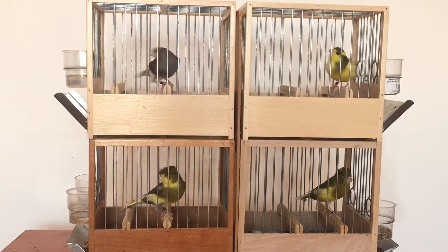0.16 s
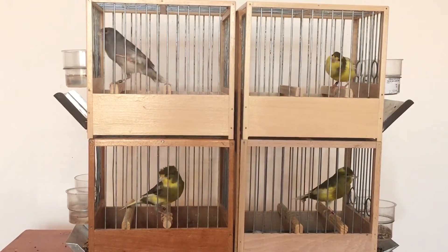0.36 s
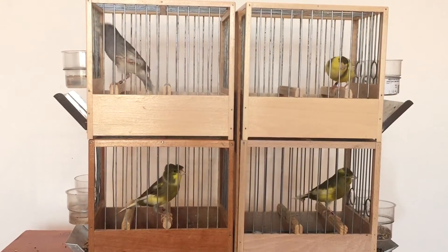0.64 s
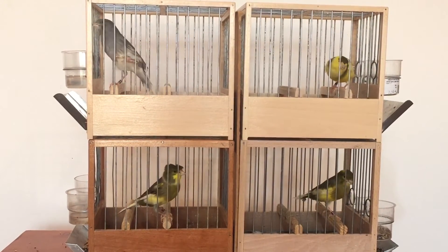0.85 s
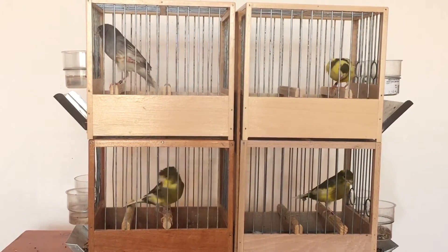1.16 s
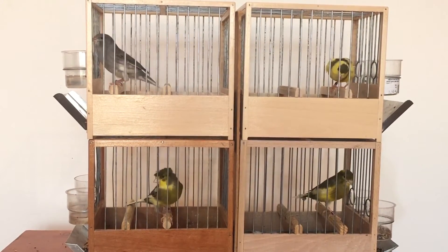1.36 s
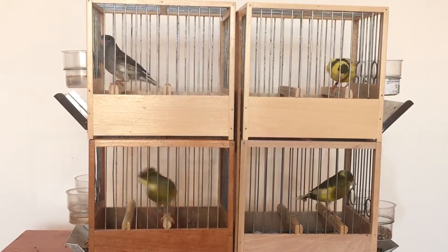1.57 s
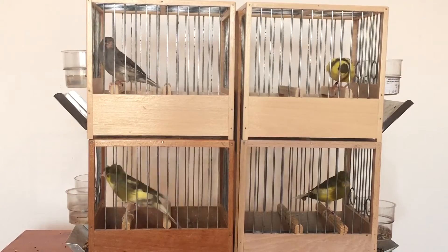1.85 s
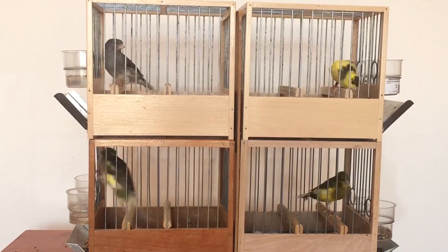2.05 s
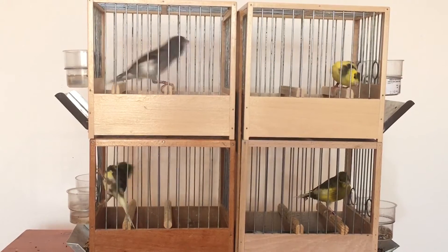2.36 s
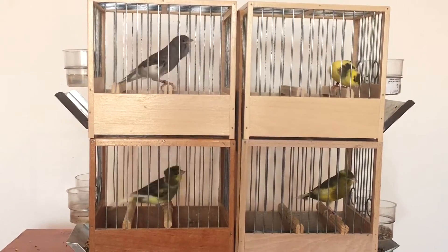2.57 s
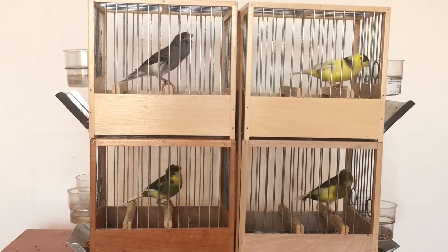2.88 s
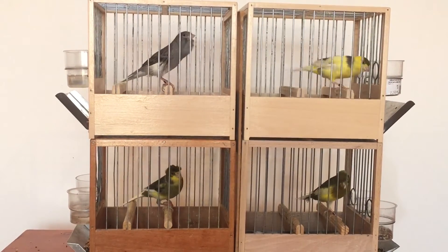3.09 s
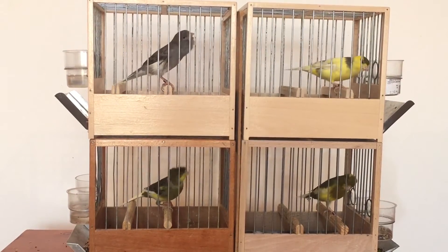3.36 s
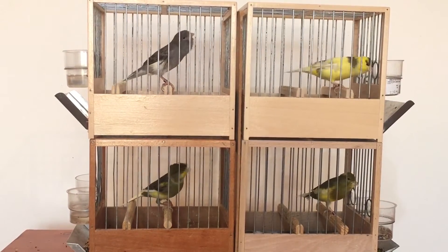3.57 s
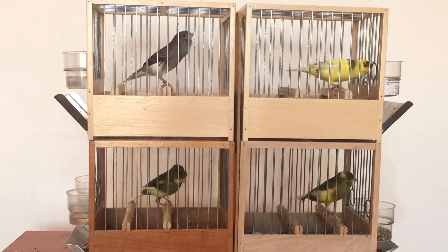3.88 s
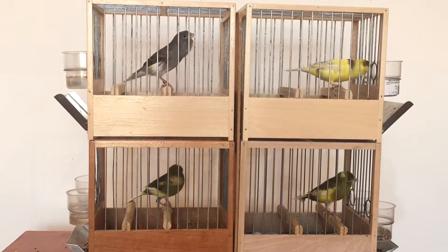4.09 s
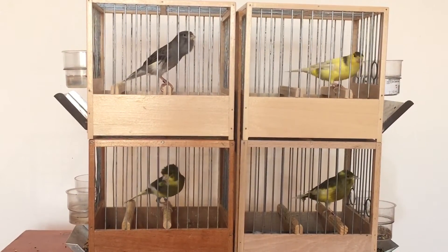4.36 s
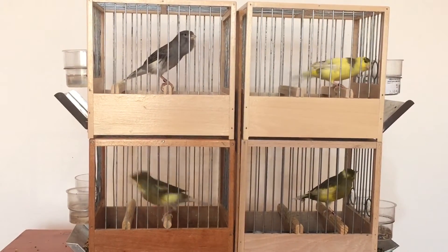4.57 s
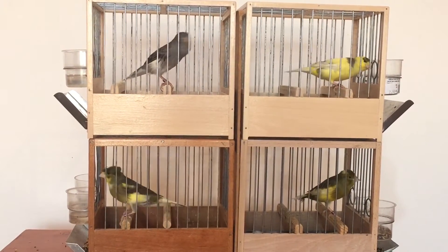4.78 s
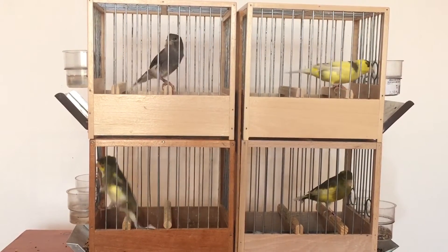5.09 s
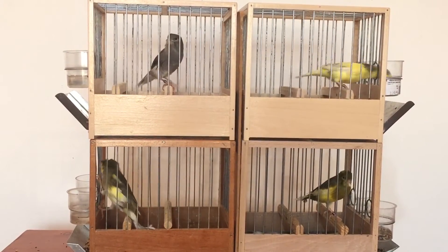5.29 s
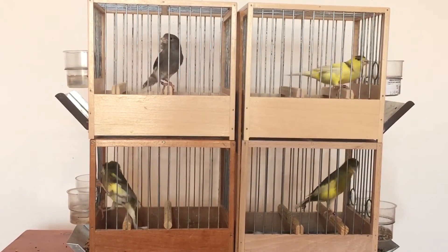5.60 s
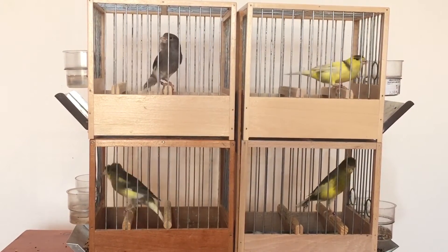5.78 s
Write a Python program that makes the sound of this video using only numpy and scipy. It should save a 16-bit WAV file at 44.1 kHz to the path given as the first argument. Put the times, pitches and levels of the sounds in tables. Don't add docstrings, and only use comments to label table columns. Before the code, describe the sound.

Fairly close microphone in a hard-walled room with faint hiss and low rumble. First come short buzzy two-voiced calls, hollow perch taps, small rustles and echoing warbles of birds farther off. From the middle, one canary sings a bowed, sliding, fluted phrase three times, moves to a louder regular trill at about five per second, then two quick low swoops and crisp ticking. A few dull cage bumps interrupt.

```python
import sys
import numpy as np
from scipy import signal
from scipy.fft import rfft, irfft
from scipy.io import wavfile
from scipy.ndimage import uniform_filter1d

SR = 44100
rng = np.random.default_rng(int(sys.argv[2]) if len(sys.argv) > 2 else 0)


def invert_db(level):
    return 10 ** (np.asarray(level, dtype=float) / 20)


def dump_mix(stems):
    frames = np.atleast_2d(stems).T
    limited = np.clip(frames, -1, 1)
    pcm = np.round(limited * 32767).astype(np.int16)
    wavfile.write(sys.argv[1], SR, pcm)


N = 261954
TOP_HZ = 16200


def rms_one(x):
    return x / np.sqrt(np.mean(x ** 2) + 1e-20)


def at_hz(points, hz):
    points_hz, points_db = np.transpose(points)
    return np.interp(np.log(np.maximum(hz, 1)), np.log(points_hz), points_db)


def coloured(spectrum):
    white = rfft(rng.standard_normal(N))
    return rms_one(irfft(white * invert_db(at_hz(spectrum, np.fft.rfftfreq(N, 1 / SR))), N))


def drift(rate_hz):
    r = np.exp(-2 * np.pi * rate_hz / SR)
    settled = signal.lfilter([1], [1, -2 * r, r * r], rng.standard_normal(N + 9000))[9000:]
    return rms_one(settled)


def add(track, piece, start_s):
    i = max(round(start_s * SR), 0)
    track[i:i + len(piece)] += piece[:len(track) - i]


def ring(hz, t60_s, rise_cycles=6.0):
    t = np.arange(round(t60_s * SR)) / SR
    swell = np.sin(np.pi / 2 * np.minimum(t * hz / rise_cycles, 1)) ** 2
    return np.sin(2 * np.pi * hz * t) * invert_db(-60 * t / t60_s) * swell


# pitch_hz, density_db (dB per Hz)
FLOOR_COLOUR = [(150, -5), (300, -3.5), (800, -9.5), (1500, -5), (2500, -7.5), (5000, -14.5),
                (10000, -19.5), (16000, -18)]


def quiet_floor():
    return invert_db(-67.5 + 0.25 * drift(0.54)) * coloured(FLOOR_COLOUR)


# pitch_hz, density_db (dB per Hz)
RUMBLE_COLOUR = [(22, -39), (36, -14.5), (55, 2), (110, 0), (200, 1), (350, -15.5), (700, -82)]
# peak_s, peak_db, half_length_s
THUDS = [
    (0.682, -72, 0.044),
    (0.783, -67, 0.02),
    (1.848, -74, 0.29),
    (3.647, -72, 0.11),
    (3.874, -69, 0.12),
    (4.032, -58, 0.014),
    (4.282, -78, 0.1),
    (4.767, -53.5, 0.0052),
    (5.935, -76, 0.012),
]


def house_rumble():
    noise, t = coloured(RUMBLE_COLOUR), np.arange(N) / SR
    swells = sum(invert_db(peak_db) * np.exp(-((t - s) / half) ** 2) for s, peak_db, half in THUDS)
    return (invert_db(-80 + 3 * drift(3.1)) + swells) * noise


# start_s, end_s, first_hz, last_hz, level_db
WHISTLES = [
    (0.05, 0.065, 1734, 1756, -49),
    (.235, .26, 1730, 1740, -63.5),
    (.64, 0.69, 1800, 1790, -57.5),
    (1.13, 1.19, 2760, 2230, -52),
    (1.265, 1.34, 1900, 1840, -55.5),
    (1.35, 1.44, 1800, 1740, -55.5),
    (1.29, 1.404, 2800, 2900, -62),
    (1.3, 1.39, 2700, 3900, -65),
    (2.085, 2.095, 8100, 8200, -58),
    (1.95, 2.12, 4000, 3600, -65.5),
]
# start_s, end_s, first_hz, last_hz, level_db
WARBLES = [(.665, .73, 3450, 3374, -54.5), (.7, .8, 2880, 2933, -53.5), (.74, .8, 3615, 3310, -57),
           (.79, .85, 3227, 3306, -48), (.93, 1.0, 3350, 3330, -73), (.79, .86, 3650, 3600, -66),
           (.82, .89, 2600, 2970, -61), (.87, .95, 3200, 4200, -70.5), (1.17, 1.33, 2320, 2197, -53.5),
           (1.14, 1.22, 2720, 2530, -65), (1.3, 1.395, 2500, 2220, -69), (1.75, 1.843, 2650, 2150, -51),
           (1.87, 1.983, 1846, 1810, -49.5), (4.546, 4.626, 901, 903, -48.5), (1.75, 1.8, 1400, 1690, -61),
           (0.57, .8, 1800, 1760, -66.5), (5.772, 5.83, 4000, 3400, -55), (5.775, 5.84, 3900, 2700, -49),
           (5.85, 5.93, 2900, 3100, -45)]


def far_birds():
    out, wobble = np.zeros(N), drift(113)
    for rows, share_of_pitch in [(WHISTLES, 0.015), (WARBLES, 0.032)]:
        for start_s, end_s, first_hz, last_hz, level_db in rows:
            count = round((end_s - start_s) * SR)
            glide_hz = np.linspace(first_hz, last_hz, count)
            hz = glide_hz * (1 + share_of_pitch * wobble[round(start_s * SR):][:count])
            tone = np.sin(2 * np.pi * np.cumsum(hz) / SR)
            add(out, invert_db(level_db) * signal.windows.tukey(count, .35) * tone, start_s)
    return out


# start_s, peak_db, main_hz, side_modes_db
HOPS = [(0.256, -49.5, 1050, -5.5), (0.333, -40.5, 1060, -24), (0.715, -60.5, 1314, 8),
        (1.078, -26.5, 915, -22.5), (1.35, -43, 1034, -6), (1.526, -48, 1074, -2), (1.624, -28, 1046, -25),
        (1.743, -28, 1019, -19), (1.874, -23.5, 1035, -5), (2.151, -46.5, 1020, -2), (2.445, -40, 958, -8),
        (2.631, -27.5, 913, -8.5), (2.865, -36, 995, -14), (2.918, -23.5, 981, -12.5),
        (5.442, -38, 956, -31), (5.802, -32, 992, 1), (5.922, -37.5, 1090, -6)]
# ring_ratio, t60_s
SIDE_MODES = [(.7, 0.021), (0.857, 0.022), (1.15, 0.028), (1.602, 0.05), (1.819, 0.033), (2.6, 0.018)]
# ring_ratio, level_db
TWIN_MODES = [(.95, -9), (1.062, -5.5)]


def perch_knocks():
    out, perch_gain_db, perch_t60_s = np.zeros(N), -3.5, 0.047
    spreads_db = rng.normal(0, 4.1, (len(HOPS), len(SIDE_MODES)))
    for (start_s, peak_db, hz, side_db), spread_db in zip(HOPS, spreads_db):
        knock_db = peak_db + perch_gain_db
        add(out, invert_db(knock_db) * ring(hz, perch_t60_s), start_s)
        for ratio, twin_db in TWIN_MODES:
            add(out, invert_db(knock_db + twin_db) * ring(hz * ratio, perch_t60_s), start_s)
        for (ratio, t60_s), d in zip(SIDE_MODES, spread_db):
            add(out, invert_db(knock_db + side_db + d) * ring(hz * ratio, t60_s), start_s)
        add(out, invert_db(-46 + 0.38 * peak_db) * ring(290, 0.077), start_s)
    return out


# start_s, peak_db, pitch_hz, t60_s
BUMPS = [(0.429, -45.5, 414, 0.042), (1.757, -44, 290, 0.05), (1.92, -25, 290, 0.02),
         (2.762, -55, 169.6, 0.17), (3.575, -20.5, 409, 0.012), (3.662, -77, 74.5, 0.19),
         (4.031, -78, 119, 0.11), (4.772, -70, 131, 0.041), (5.154, -25, 290, 0.028),
         (5.404, -46, 364, 0.07), (5.15, -35.5, 690, 0.023), (5.186, -44.5, 457, 0.03),
         (5.37, -36, 698, 0.025), (2.959, -45.5, 390, 0.04)]
# start_s, peak_db, pitch_hz, t60_s
CLINKS = [(1.318, -62, 7300, .03), (1.32, -63, 5500, .04), (1.362, -58, 5700, .04),
          (1.775, -56, 5850, .035), (1.78, -57, 5660, .035), (1.776, -50.5, 8340, 0.033),
          (1.777, -60, 7540, .03), (1.874, -42, 6700, .015), (1.875, -40, 4360, 0.044),
          (1.875, -37, 3680, 0.049), (1.875, -36.5, 5940, .02), (1.878, -47, 8550, .03)]


def bumps_and_clinks():
    out = np.zeros(N)
    for start_s, peak_db, hz, t60_s in BUMPS + CLINKS:
        add(out, invert_db(peak_db) * ring(hz, t60_s), start_s)
    return out


# start_s, length_s, level_db
RUSTLES = [(0.252, 0.028, -66), (0.369, 0.08, -49), (0.424, 0.01, -62), (0.486, 0.0065, -60),
           (0.707, 0.024, -66), (1.306, 0.075, -68), (1.43, 0.05, -58), (1.745, 0.06, -67),
           (1.871, 0.018, -48), (2.44, 0.037, -55.5), (3.0, 0.02, -64), (5.79, 0.148, -55),
           (2.547, 0.04, -65), (2.89, 0.06, -59), (4.047, 0.035, -68), (5.18, 0.02, -50),
           (5.144, 0.047, -60), (5.76, 0.035, -58)]
# pitch_hz, density_db (dB per Hz)
RUSTLE_COLOUR = [(700, -9.5), (1500, -7.5), (3000, 0.5), (6000, -6.5), (10000, -11), (16000, -4.5)]


def rustle():
    out, noise = np.zeros(N), coloured(RUSTLE_COLOUR) * invert_db(3.5 * drift(150))
    peaks_hz = np.exp(rng.uniform(*np.log((4400, 12700)), (len(RUSTLES), 2)))
    for (start_s, length_s, level_db), pair_hz in zip(RUSTLES, peaks_hz):
        count = round(length_s * SR)
        piece = noise[round(start_s * SR):][:count]
        rings = sum(signal.lfilter(*signal.iirpeak(hz, 6.5, SR), piece) for hz in pair_hz)
        add(out, invert_db(level_db - 3) * np.hanning(count) * (piece + invert_db(9) * rings), start_s)
    return out


# pitch_hz, density_db (dB per Hz)
BREATH_COLOUR = [(600, -41), (1100, -18.5), (2000, -11.5), (3200, 12), (4000, 6.5), (4600, -8),
                 (8000, -14.5), (16000, -52)]
# pitch_hz, density_db (dB per Hz)
RASP_COLOUR = [(50, 1.5), (150, -5), (400, 20.5), (650, -14.5), (1000, -52)]


def unsteadiness():
    return np.array([drift(135), drift(62.0), coloured(BREATH_COLOUR), coloured(RASP_COLOUR)])


# pitch_hz, level_db (re fundamental)
OVERTONES = [(2200, 6.5), (3100, -10), (4400, -27.5), (5400, -27.5), (7000, -34.5), (8800, -34),
             (11000, -41), (14800, -41)]
# time_s, level_db
SECOND_VOICE = [(.028, -42), (.036, -23), (.046, 1.5), (.066, 2)]
SIDE_TONES = [0.5, -8.5, -19.5]


def sing(shape, times, chance, rich_db, breath_db, rasp_db, rough, upper_db=0, second=False):
    out, (s, shape_hz, shape_db) = np.zeros(N), np.transpose(shape)
    slow = rms_one(uniform_filter1d(chance[1], size=SR // 8))
    mean_db = np.mean(times, axis=0)[1]
    for start_s, level_db, pitch, stretch in times:
        t = np.arange(s[0] * stretch, s[-1] * stretch, 1 / SR)
        at = ((start_s + t) * SR).astype(int)
        waver, tremble, air, rasp = chance[:, at % N]
        smooth_hz = np.interp(t, s * stretch, shape_hz)
        f = pitch * smooth_hz * (1 + 0.01 * rough * waver)
        phase = 2 * np.pi * np.cumsum(f) / SR
        effort_db = np.interp(t, s * stretch, shape_db)
        glide = np.minimum(abs(np.gradient(np.log2(smooth_hz))) * SR, 30)
        glide_loss_db = .45 * uniform_filter1d(glide, size=SR // 200)
        sides = 1
        if second:
            mix = invert_db(np.interp(t, *np.transpose(SECOND_VOICE)))
            spacing = .208
            tones = sum(invert_db(d) * np.exp(1j * (j + 1) * spacing * phase) for j, d in enumerate(SIDE_TONES))
            sides = 1 + mix * tones
        stack = np.exp(1j * phase)
        for k in range(2, 11):
            flicker_db = 4 * chance[1, (at + k * SR // 10) % N]
            partial_db = at_hz(OVERTONES, k * f) + rich_db + flicker_db - glide_loss_db
            partial_db = partial_db + 0.064 * (effort_db + level_db + 29.0) + 0.23 * (level_db - mean_db)
            if k > 2:
                partial_db = partial_db + 3 * (slow[(at + k * SR // 3) % N] - 1) + upper_db
            grain = 1 + k * invert_db(rasp_db) * chance[3, (at + k * SR // 7) % N]
            stack = stack + grain * invert_db(partial_db) * (k * f < TOP_HZ) * np.exp(1j * k * phase)
        fade = np.sin(np.pi / 2 * np.clip(np.minimum(t - t[0], t[-1] - t) / .002, 0, 1)) ** 2
        loud = fade * invert_db(level_db + effort_db + 1.45 * rough * tremble)
        voiced = (stack * sides).real * (1 + invert_db(rasp_db) * rasp)
        add(out, loud * (voiced + invert_db(breath_db) * air), start_s + t[0])
    return out


# time_s, pitch_hz, level_db
CALL = [(0, 2250, -26), (.01, 2570, -11), (.026, 2530, -1.5), (.038, 2520, 4), (.05, 2510, 2),
        (.06, 2505, -5), (.07, 2500, -30)]
CALLS_AT = [
    (.372, -24, 1.001, 0.84),
]
REPLY = [(0, 2330, -26), (.008, 2490, -12), (.018, 2500, -3), (.028, 2445, -3), (.04, 2450, 2),
         (.052, 2480, 2), (.062, 2480, -28)]
REPLIES_AT = [
    (1.413, -28, 1.001, 0.93),
]
DIP = [(0, 2474, -13), (.012, 2453, 1), (.032, 2340, 1), (.042, 2308, -20)]
DIPS_AT = [
    (0.481, -26, 1.001, 0.86),
]
DROP = [(0, 3006, -24), (.01, 2992, -1.5), (.026, 2718, 2), (.04, 2250, -14.5), (.046, 2050, -54)]
DROPS_AT = [
    (1.845, -22, 1.001, 1.2),
]


def calls(chance):
    out = sing(CALL, CALLS_AT, chance, rich_db=6.0, breath_db=-25, rasp_db=-47, rough=0.77, second=True)
    out += sing(REPLY, REPLIES_AT, chance, rich_db=9, breath_db=-27, rasp_db=-50, rough=.6, second=True)
    out += sing(DIP, DIPS_AT, chance, rich_db=7.0, breath_db=-24.5, rasp_db=-41, rough=0.57)
    out += sing(DROP, DROPS_AT, chance, rich_db=-3, breath_db=-24.5, rasp_db=-23, rough=0.33, upper_db=13)
    return out


# time_s, pitch_hz, level_db
BOW = [(-.003, 2066, -18), (.012, 2036, -6.5), (.028, 2032, -4), (.032, 1967, 1), (.046, 1860, -5.5),
       (.058, 1720, -9), (.066, 1750, -29.5)]
BOWS_AT = [
    (2.309, -29, 1, 0.86),
    (2.836, -26, 1.005, 0.99),
    (3.422, -25, 1.001, 1.001),
]
LIFT = [(.07, 1796, -28), (.092, 1798, -10), (.097, 1852, 1), (.109, 1896, -3.5), (.114, 1900, -11.5),
        (.122, 1850, -49)]
LIFTS_AT = [
    (2.292, -28, 0.99, 1.05),
    (2.836, -27.5, 0.99, 1.004),
    (3.421, -25, 1.001, 1.001),
]
SLIDE = [(-.008, 2740, -25), (.008, 2740, -6), (.018, 2614, -8.5), (.04, 2428, 1.5), (.058, 2258, 1.5),
         (.066, 2240, -1), (.08, 2195, 2), (.09, 2030, -14.5)]
SLIDES_AT = [
    (2.456, -36.5, 1.04, 0.88),
    (2.987, -33.5, 1.016, 1),
    (3.563, -33.5, 1.001, 1.001),
]
STRAND = [(.006, 2825, -31), (.014, 2964, -14), (.035, 2900, -16.5), (.052, 2870, -19)]
CUP = [(0, 1930, -16), (.003, 1940, 3), (.011, 1786, 1), (.019, 1880, 2.5), (.021, 1830, -2)]
CUPS_AT = [
    (2.522, -33.5, 1.04, 1.04),
    (3.057, -31, 1.044, 1.01),
    (3.633, -30, 1.001, 1.001),
]
FLUTE = [(-.003, 1674, -15), (.003, 1656, -9), (.03, 1588, -0.5), (.08, 1581, 1), (.11, 1568, -3.5),
         (.18, 1515, 0.5), (.27, 1468, -1), (.285, 1490, -23)]
FLUTES_AT = [
    (2.571, -36.5, 0.98, 0.78),
    (3.104, -35.5, 0.98, 0.98),
    (3.682, -34, 1.001, 1.001),
]


def three_part_song(chance):
    song = sing(BOW, BOWS_AT, chance, rich_db=-0.5, breath_db=-33.0, rasp_db=-44.0, rough=0.59, upper_db=-2.0)
    song += sing(LIFT, LIFTS_AT, chance, rich_db=4.0, breath_db=-31.5, rasp_db=-50.0, rough=0.51, upper_db=-4.5)
    song += sing(SLIDE, SLIDES_AT, chance, rich_db=-3, breath_db=-25, rasp_db=-20, rough=1.3, upper_db=2)
    song += sing(STRAND, SLIDES_AT, chance, rich_db=-8.0, breath_db=-18, rasp_db=-17, rough=1.6)
    song += sing(CUP, CUPS_AT, chance, rich_db=1.5, breath_db=-22, rasp_db=-22, rough=1.6)
    flute = sing(FLUTE, FLUTES_AT[:1], chance, rich_db=1.5, breath_db=-52, rasp_db=-53, rough=0.4,
                 upper_db=-12.5)
    flute += sing(FLUTE, FLUTES_AT[1:], chance, rich_db=1.0, breath_db=-66, rasp_db=-60, rough=0.32,
                  upper_db=-3.5)
    beads_db = 3 * np.tanh(drift(32))
    return song + flute * invert_db(beads_db)


# rise_s, rise_db, chip_s, chip_db, hook_db
TRILL = [
    (4.06, -21, 4.138, -19, -65),
    (4.265, -22, 4.344, -18, -41),
    (4.473, -20.5, 4.552, -17.5, -45),
    (4.682, -20.5, 4.762, -17, -33),
    (4.891, -20, 4.972, -17, -32.5),
    (5.103, -20.5, 5.189, -17.5, -38),
    (5.319, -20, 5.399, -17, -37),
]


def trill_times(column, pitch, length, lag=(0, 0), level=None):
    rows = np.array(TRILL)
    levels_db = rows[:, level or column + 1]
    return [(s + lag[0], d + lag[1], pitch, length) for s, d in zip(rows[:, column], levels_db)]


def after_chips(lag):
    return trill_times(2, 0.98, 0.88, lag)


# time_s, pitch_hz, level_db
RISE = [(-.018, 1180, -32), (-.004, 1290, -23), (.001, 1400, -8), (.012, 1670, -6), (.03, 1760, -7),
        (.037, 1757, -18), (.056, 1757, -21), (.066, 1865, -20), (.074, 2200, -27)]
MURMUR = [(-.045, 1358, 8), (-.03, 1298, -5), (-.015, 1150, 8.5), (0, 1210, 6.5)]
HOOK = [(-.038, 3605, -28), (-.025, 3470, -1), (-.014, 3800, -3.5), (-.008, 4250, -20), (-.004, 4230, -8)]
CHIP = [(0, 3160, -18), (.002, 3110, -4), (.004, 3050, 0), (.0065, 2960, -6), (.0095, 2890, -24)]
BUZZ = [(0, 3064, -32.5), (.004, 2926, -6), (.012, 2913, -1), (.026, 2883, -10), (.04, 2762, -16),
        (.048, 2450, -8)]
UNDER = [(0, 2485, -17), (.012, 2517, 3), (.045, 2536, 2), (.058, 2377, -23), (.085, 2250, 2),
         (.095, 2340, -23)]


def trill(chance):
    rises, murmurs = trill_times(0, 1.005, 0.96), trill_times(0, 1.005, 0.96, (0, -31))
    chips = [*after_chips((0, 0)), *after_chips((.0157, -2))]
    hooks = trill_times(2, 0.97, .9, level=4)
    song = sing(RISE, rises, chance, rich_db=-1, breath_db=-36, rasp_db=-27, rough=1.1, upper_db=2)
    song += sing(CHIP, chips, chance, rich_db=4, breath_db=-28, rasp_db=-17, rough=0.14)
    song += sing(MURMUR, murmurs, chance, rich_db=-1, breath_db=-45, rasp_db=-25.5, rough=3)
    song += sing(BUZZ, after_chips((0.021, -8.5)), chance, rich_db=6, breath_db=-36, rasp_db=-14, rough=1.1)
    song += sing(UNDER, after_chips((0.027, -24)), chance, rich_db=7, breath_db=-50, rasp_db=-15, rough=1.0)
    song += sing(HOOK, hooks, chance, rich_db=1.0, breath_db=-34, rasp_db=-8.5, rough=0.6)
    return song


# time_s, pitch_hz, level_db
LEAD = [(0, 1900, 1), (.006, 2110, -5), (.022, 2120, -6), (.034, 2328, -7)]
LEADS_AT = [
    (5.484, -35, 1.001, 0.86),
    (5.62, -36, 1.001, 0.85),
]
SWELL = [(-.04, 966, -31), (-.03, 1072, -18), (-.01, 1083, -23), (.004, 1416, 2), (.018, 1600, 2.5),
         (.036, 1562, -11.5), (.045, 1480, -61)]
SWELLS_AT = [
    (5.523, -27.5, .97, 0.97),
    (5.656, -26, 1.001, 0.98),
]


def swells(chance):
    song = sing(LEAD, LEADS_AT, chance, rich_db=-13, breath_db=-24.5, rasp_db=-11, rough=0.54)
    song += sing(SWELL, SWELLS_AT, chance, rich_db=2.0, breath_db=-51, rasp_db=-35.0, rough=0.69, upper_db=-5.0)
    return song


# time_s, pitch_hz, level_db
TICK = [(0, 2500, -8), (.0018, 2520, -1), (.003, 2384, 0), (.005, 2260, -4), (.008, 2150, -16)]
# start_s, level_db, pitch_factor, length_factor
TICKS_AT = [(5.769, -33, 1.05, 1.2), (5.791, -30, 1.03, 1.6), (5.81, -35, 1, 1.5), (5.822, -31, .98, 2.2),
            (5.772, -35, 1.4, 1.4), (5.777, -38, 1.25, 1.4), (5.787, -40, 1.45, 2.5),
            (5.805, -39, 1.45, 1.5), (5.907, -31, 1.03, 1), (5.917, -35, 1.02, 1.8), (5.928, -33, .97, 1.5),
            (5.78, -46, .45, 2.5), (5.804, -44, .62, 1.5), (1.876, -26, .95, .8), (5.8418, -22, .97, .8),
            (5.8485, -24.5, .97, .8), (5.864, -19, 1, 1), (5.8715, -31, 1.02, .7), (5.89, -18, 1, .9),
            (5.889, -29, 1.36, .6), (5.843, -47, 1.75, 1.5), (5.893, -46, 1.72, 1.5), (5.769, -46, 1.75, 2)]


def ticks(chance):
    return sing(TICK, TICKS_AT, chance, rich_db=-12, breath_db=-26, rasp_db=-22, rough=1.1, upper_db=8)


# pitch_hz, t60_s
ROOM_T60 = [(200, 0.57), (1000, 0.2943), (2500, 0.45), (5000, 0.43), (10000, 0.2144)]


def room_tail(build_s):
    t, tail = np.arange(SR // 2) / SR, 0
    edges_hz = 60 * 2 ** np.arange(0, 9.)
    for low, high in zip(edges_hz, edges_hz[1:]):
        octave = signal.butter(2, [low, high], "band", fs=SR, output="sos")
        band = signal.sosfilt(octave, rng.standard_normal(len(t)))
        tail = tail + band * invert_db(-60 * t / at_hz(ROOM_T60, np.sqrt(low * high)))
    tail = tail * np.minimum(t / build_s, 1) ** 2
    return rms_one(tail) / np.sqrt(len(t))


# delay_s, level_db
ECHOES = [(.0066, -13.5), (0.0094, -11), (0.02, -21), (.027, -12)]


def room_response():
    response = invert_db(-4) * room_tail(build_s=0.0026)
    response[0] += 1
    for delay_s, level_db in ECHOES:
        response[round(delay_s * SR)] += invert_db(level_db)
    return response


def scene():
    floor = quiet_floor() + house_rumble()
    far = signal.fftconvolve(far_birds(), room_tail(build_s=0.0017))[:N]
    chance = unsteadiness()
    near = perch_knocks() + bumps_and_clinks() + rustle()
    near += calls(chance) + three_part_song(chance) + trill(chance) + swells(chance)
    ticking, facing_share = ticks(chance), .4
    near += (1 - facing_share) * ticking
    heard = signal.fftconvolve(near, room_response())[:N]
    return (heard + far + facing_share * ticking + floor)[None]


def roll_off(x):
    return signal.sosfilt(signal.butter(12, 16140, fs=SR, output="sos"), x)


def record(dry):
    cut = signal.sosfilt(signal.cheby2(12, 60, TOP_HZ, fs=SR, output="sos"), dry)
    cut = signal.sosfilt(signal.butter(4, 32, "high", fs=SR, output="sos"), cut)
    return roll_off(cut)


dry = scene()
out = record(dry)
dump_mix(out)
```